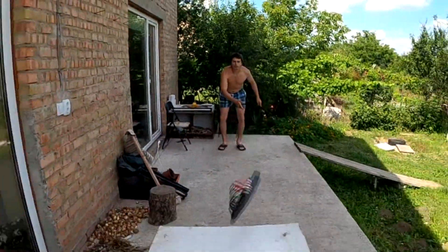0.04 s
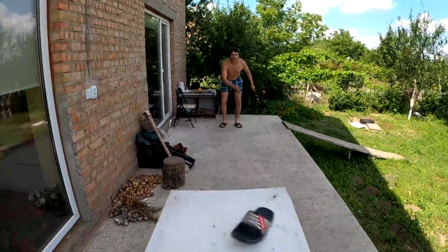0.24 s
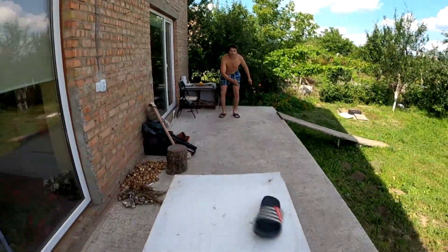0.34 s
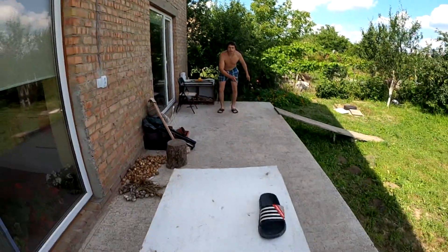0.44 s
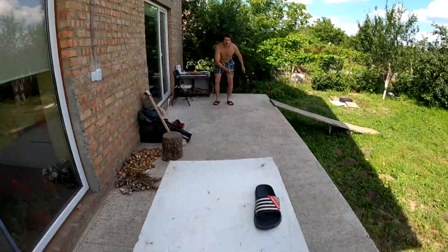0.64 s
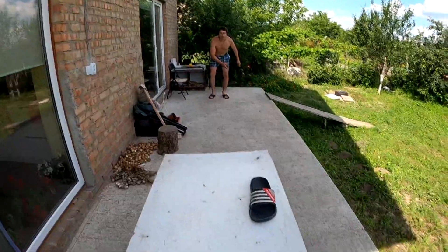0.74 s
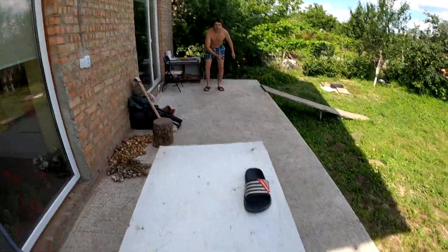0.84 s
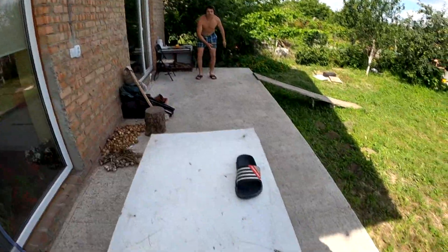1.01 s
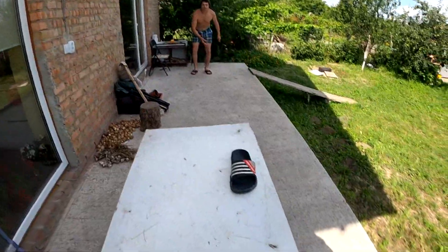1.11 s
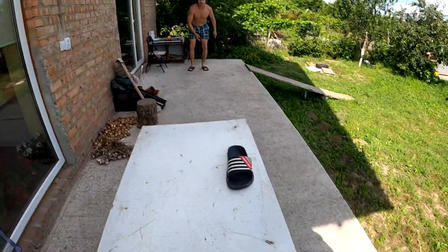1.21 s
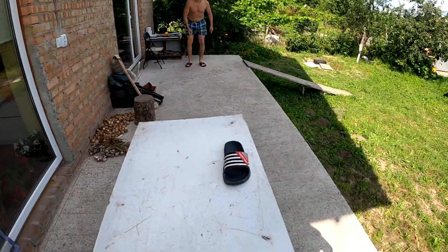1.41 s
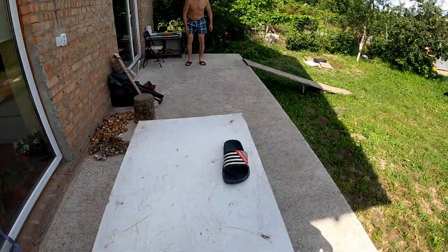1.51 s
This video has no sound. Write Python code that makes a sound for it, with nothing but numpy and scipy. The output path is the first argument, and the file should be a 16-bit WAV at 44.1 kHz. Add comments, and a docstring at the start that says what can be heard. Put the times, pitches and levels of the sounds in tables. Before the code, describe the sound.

A rubber sandal lands on a wooden board with a sharp, loud slap at about 0.25 seconds, echoing briefly off a patio wall. It lands again more softly at 0.4 seconds, skids slightly and settles with light taps by 0.5. A soft bump comes near 0.8 seconds. Quiet garden air continues to about 1.5 seconds, with barely audible insect ticks, a distant tone and one far bird chirp.

```python
"""Over quiet garden air and a light breeze on the microphone, a thrown rubber sandal lands on a wooden
board on a patio. Its edge knocks twice, exciting the board's modes, then the sole slaps flat and expels
air. It hops, lands again, skids and settles; a brick wall and the yard reflect each blow.
Then a faint distant tone sets in, a soft bump sounds close by, an insect ticks and a far bird chirps."""
import sys
import numpy as np
from scipy import signal
from scipy.fft import rfft, irfft
from scipy.io import wavfile

SR = 44100
rng = np.random.default_rng(int(sys.argv[2]) if len(sys.argv) > 2 else 0)


def digitize_waveform(pressure):
    """Quantize a signal to 16-bit integers and store it at the path in sys.argv[1].

    Rows of a 2-D input are taken as channels; values are limited to [-1, 1].
    """
    field = np.atleast_2d(pressure).T
    bounded = np.clip(field, -1, 1)
    quanta = np.round(bounded * 32767).astype(np.int16)
    wavfile.write(sys.argv[1], SR, quanta)


N = 68355
T = np.arange(N) / SR
BAND_EDGES_HZ = 45 * 2 ** np.arange(0, 8.6, .5)  # half-octaves


def from_db(db):
    """Amplitude ratio of a level in decibels."""
    return 10 ** (np.asarray(db) / 20)

def rms_one(x):
    """Normalisation to unit rms."""
    return x / np.sqrt(np.mean(x ** 2) + 1e-20)

def at_hz(points, hz):
    """Interpolation of a table's columns over log frequency."""
    knots, *columns = np.transpose(points)
    return [np.interp(np.log(hz + 1e-3), np.log(knots), column) for column in columns]

def convolve(x, response):
    """Convolution with an impulse response."""
    return signal.fftconvolve(x, response)[:N]

def butterworth(x, hz, kind, order=2):
    """Butterworth filtering: a maximally flat passband."""
    return signal.sosfilt(signal.butter(order, hz, kind, fs=SR, output="sos"), x + 1e-18)

def coloured(x, spectrum):
    """Minimum-phase filtering: folding the cepstrum makes the response causal."""
    size = 8192
    gain = from_db(at_hz(spectrum, np.arange(size // 2 + 1) * SR / size)[0])
    cepstrum = irfft(np.log(gain))
    cepstrum[1:size // 2] *= 2
    cepstrum[size // 2 + 1:] = 0
    return convolve(x, irfft(np.exp(rfft(cepstrum))))

def noise(spectrum):
    """Stationary filtered noise of unit rms."""
    return rms_one(coloured(rng.standard_normal(N), spectrum))

def swells(rows):
    """Superposed envelopes: square-root rise, then exponential decay with time constant `fall`."""
    envelope = 0
    for start, rise, fall, db in rows:
        attack = np.sqrt(np.clip((T - start) / rise, 0, 1))
        envelope += from_db(db) * attack * np.exp(-np.maximum(T - start - rise, 0) / fall)
    return envelope

def contact_force(start, rise_ms):
    """Force pulse of a compliant contact: a quick rise to 1 and a slower fall."""
    age = np.maximum(T - start, 0) * 1000 / rise_ms
    return age * np.exp(1 - age)


# Spectrum of the garden air. Each row: frequency in Hz, relative density in dB.
AIR_SPECTRUM = [(60, -8.5), (110, -4.5), (230, -9.5), (550, -15), (1100, -17), (1400, -20), (1660, -20),
                (2000, -22.5), (2500, -26.5), (3500, -28.5), (4600, -32), (6400, -32.5), (8500, -25),
                (9600, -37), (11500, -45.5), (13500, -54.5)]

def garden_air(level_db=-64.5, early_db=-3.5, rise_s=.4):
    """Ambient noise: a broadband floor that rises slightly, then holds."""
    return noise(AIR_SPECTRUM) * from_db(level_db + early_db * np.clip(1 - T / rise_s, 0, 1))

# Course of a distant tone. Each row: time in seconds, frequency in Hz, rms level in dB.
TONE_GLIDE = [(.7, 1660, -82.5), (.87, 1690, -76.5), (0.999, 1652, -89), (1.18, 1625, -78),
              (1.301, 1596, -75.5), (1.42, 1549, -85.5)]

def far_tone():
    """A faint gliding sinusoid, whose phase is the integral of its frequency."""
    times, hz, db = np.transpose(TONE_GLIDE)
    phase = 2 * np.pi * np.cumsum(np.interp(T, times, hz)) / SR
    return np.sqrt(2) * np.sin(phase) * np.interp(T, times, from_db(db), left=0, right=0)

def far_bird(hz=2920, start_s=.962, rise_s=.018, fall_s=.008, level_db=-72.5):
    """Amplitude modulation: one brief swell of a pure tone makes a chirp."""
    return np.sin(2 * np.pi * hz * T) * swells([(start_s, rise_s, fall_s, level_db)])

# Insect ticks. Each row: start, rise and fall in seconds, level in dB.
TICKS = [(.908, .005, 0.00505, -71), (1.124, 0.00503, 0.00518, -75.5), (1.331, .005, .006, -71.5)]
# Their spectrum. Each row: frequency in Hz, relative level in dB.
TICK_SPECTRUM = [(1000, -34), (4500, -12), (6200, 3), (8500, 0), (12000, -21)]

def insect():
    """Transients: short bursts of high-frequency noise are heard as ticks."""
    return noise(TICK_SPECTRUM) * swells(TICKS)

# Puffs on the microphone. Each row: start, rise and fall in seconds, level in dB.
PUFFS = [(.05, .04, 0.018, -59), (.62, 0.018, .012, -56)]
# Spectra of the steady breeze and the puffs. Each row: frequency in Hz, relative level in dB.
BREEZE_SPECTRUM = [(8, 0.5), (20, -9.5), (40, -12.5), (80, -19), (160, -42.5), (600, -74)]
PUFF_SPECTRUM = [(25, -13.5), (58, -1.5), (110, -11), (300, -41.5), (2000, -75.5)]

def breeze(steady_db=-55):
    """Turbulence: pressure fluctuations at the microphone make a low rumble with two puffs."""
    return from_db(steady_db) * noise(BREEZE_SPECTRUM) + noise(PUFF_SPECTRUM) * swells(PUFFS)

# Filter of the bump's tick. Each row: frequency in Hz, gain in dB.
BUMP_RESPONSE = [(60, -12), (300, -3), (550, -6), (1000, -12), (1550, 5), (1850, -3), (2250, 5.5),
                 (3000, -11), (6000, -23)]

def bump(start_s=.8105):
    """Pulse length sets bandwidth: a long pulse gives a soft, close bump, a short one its dull tick."""
    thump = from_db(-37) * contact_force(start_s, rise_ms=2)
    tick = from_db(-37.5) * coloured(contact_force(start_s, rise_ms=.095), BUMP_RESPONSE)
    return tick - thump

# Diffuse field of the yard. Each row: frequency in Hz, relative level in dB, 60 dB decay time in seconds.
YARD_DECAY = [(70, -16, .3), (156, -3.5, 0.36), (350, -2, .42), (700, -8.5, .35), (1500, 1, 0.27),
              (3000, -6, 0.52), (5000, -4.5, 0.3), (8500, -5.5, 0.37), (12063, -5, 0.24)]
# Treble shaping of that field. Each row: frequency in Hz, gain in dB.
YARD_RESPONSE = [(7000, 2.5), (8600, 6), (9800, -5.5), (12500, -9.5)]

def yard_reverberation(x, gain_db=-18.5, build_s=.004):
    """Reverberation: in each band the blows' energy builds up and decays. Returns middle and side."""
    white, wash = rng.standard_normal((2, 2, N)), 0
    for k, band in enumerate(zip(BAND_EDGES_HZ, BAND_EDGES_HZ[1:])):
        db, t60 = at_hz(YARD_DECAY, np.sqrt(np.prod(band)))
        decay = (from_db(-60 * T / t60) * (1 - np.exp(-T / build_s))) ** 2
        energy = np.maximum(convolve(butterworth(x, band, "band") ** 2, decay / decay.sum()), 0)
        carrier = rms_one(butterworth(white[k % 2], band, "band"))
        wash += from_db(gain_db + db) * np.sqrt(energy) * carrier
    return [coloured(channel, YARD_RESPONSE) for channel in wash]

# Reflections from the walls. Each row: delay in seconds, gain in dB.
REFLECTIONS = [(.0065, -19.5), (.015, -25.5), (.029, -28.5), (.0475, -22), (.053, -28), (0.081, -35.5),
               (.137, -37.5)]
# Filtering by the brickwork. Each row: frequency in Hz, gain in dB.
BRICK_RESPONSE = [(100, -7.5), (600, -5), (1500, 1), (3200, 0), (5000, -1.5), (10000, -4.5)]

def wall_echoes(x):
    """Early reflections: the brickwork returns delayed, weaker, slightly dull copies."""
    copies = sum(from_db(db) * np.interp(T - delay, T, x, left=0) for delay, db in REFLECTIONS)
    return coloured(copies, BRICK_RESPONSE)

# Skids on the board. Each row: start, rise and fall in seconds, level in dB.
SOLE_SKIDS = [(0.419, 0.012, 0.018, -43), (0.4475, 0.0029, 0.0036, -33)]
# Their spectrum. Each row: frequency in Hz, relative level in dB.
SKID_SPECTRUM = [(150, 16), (290, 12), (390, -10), (540, 6), (750, 2.5), (1200, -1), (2000, 2.5), (3200, 6),
                 (4400, -8.5), (6000, 0), (6900, -7), (8300, 7), (9600, -8), (12500, -22.5)]

def skids():
    """Sliding friction: rubber hisses as it slips over the wood."""
    return noise(SKID_SPECTRUM) * swells(SOLE_SKIDS)

# Claps of the flat sole. Each row: start, rise and fall in seconds, level in dB.
SOLE_SLAPS = [(0.2392, .0005, 0.0027, -24), (0.2484, .002, 0.003, -10.5), (0.2522, .0004, .0012, -14),
              (0.4176, 0.00081, 0.00614, -45.5)]
# Their spectrum. Each row: frequency in Hz, relative level in dB.
SLAP_SPECTRUM = [(100, -20), (450, -5.5), (750, -5.5), (1020, 6), (1230, -13.5), (1500, 5), (1800, 0.5),
                 (2000, 0.5), (2650, 3.5), (3600, -1.5), (4100, -8), (6000, -6), (7600, -10), (8400, -2.5),
                 (9400, -16.5), (12500, -32)]

def slaps():
    """Air displacement: a burst of noise escapes from under the tread as it claps down."""
    envelope = swells(SOLE_SLAPS)
    bursts = coloured(rng.standard_normal(N) * envelope, SLAP_SPECTRUM)
    return rms_one(bursts) * np.sqrt(np.mean(envelope ** 2))

# The board's short modes. Each row: frequency in Hz, relative density in dB, 60 dB decay time in seconds.
DENSE_MODES = [(150, -19.5, 0.02), (398.9, -8.5, 0.0601), (900, -5, 0.017), (1480, -2, 0.0223),
               (3220, 1.5, 0.013), (4621, -7, 0.041), (8420, -1, .016), (12140, -16.5, 0.017)]

def dense_modes(force, gain_db=-4.5):
    """Modal overlap: the board's many short modes respond like bands of decaying noise."""
    white, response = rng.standard_normal((2, N)), 0
    for k, (low, high) in enumerate(zip(BAND_EDGES_HZ, BAND_EDGES_HZ[1:])):
        db, t60 = at_hz(DENSE_MODES, np.sqrt(low * high))
        decay = from_db(-60 * T / t60) + 1e-12
        band = butterworth(white[k % 2] * decay, [low, high], "band")
        response += rms_one(band) * from_db(db) * np.sqrt(high - low)
    return from_db(gain_db) * convolve(force, response / np.linalg.norm(response))

# The board's strongest modes. Each row: frequency in Hz, gain in dB, 60 dB decay time in seconds.
STRONG_MODES = [(102, -57, 0.13), (164, -56.5, .2), (197, -48, 0.051), (289.39, -56.5, 0.35),
                (340.7, -59, 0.18), (407.9, -57.5, 0.15), (537.5, -51, 0.15), (717, -58, 0.019),
                (690, -52.5, .06), (832, -53.5, 0.034), (980, -51.5, 0.061), (950, -47, 0.15),
                (1435, -54.5, 0.35), (2570, -54, 0.063)]

def strong_modes(force):
    """Resonance: each mode of the board is a damped oscillator driven by the force."""
    ringing = 0
    for hz, db, t60 in STRONG_MODES:
        radius, angle = from_db(-60 / (t60 * SR)), 2 * np.pi * hz / SR
        feedback = [1, -2 * radius * np.cos(angle), radius ** 2]
        ringing += from_db(db) * signal.lfilter([0, np.sin(angle)], feedback, force + 1e-18)
    return ringing

# Contacts of sandal and board. Each row: start in seconds, force level in dB, rise time in milliseconds,
# coupling to the modes in dB, treble cutoff in Hz.
CONTACTS = [(0.2102, -38.5, 0.029, -24, 5000), (0.2173, -30, 0.057, -9, 6040),
            (0.2252, -28, 0.04, -7.5, 6040), (0.2338, -6.5, .07, -13.5, 7000),
            (0.2367, -8.5, 0.02, -4.5, 9000), (0.2392, -4.5, 0.21, -1.5, 10000),
            (0.2479, -15.5, 0.6, 4.5, 9000), (0.2526, -15.5, .06, -15, 9000),
            (0.4172, -23.5, 0.069, 7.5, 4500), (0.4207, -26.5, 0.072, -10, 4500),
            (0.4242, -38, 0.87, 14, 2000), (0.4761, -30, 0.029, 1, 4007), (0.4809, -42, 0.61, 4, 3005),
            (0.5028, -31.5, 0.027, 7, 3700), (0.5063, -38, 0.017, -6, 3695), (0.5118, -48.5, 1, 12, 2000)]
# Radiation of the thud. Each row: frequency in Hz, gain in dB.
THUD_RESPONSE = [(30, -22), (65, -14), (100, -3), (200, 3.5), (450, -1.5), (950, 10.5), (1250, -9.5),
                 (1600, 2.5), (2000, -2), (3300, 4.5), (4600, -3.5), (7000, -3), (8400, 5), (10000, -7.5),
                 (13000, -19.5)]

def knocks():
    """Impact excitation: each contact, rounded off by soft rubber, radiates a thud and rings the board."""
    total_force, drive = 0, 0
    for start, db, rise_ms, coupling_db, cutoff_hz in CONTACTS:
        force = from_db(db) * butterworth(contact_force(start, rise_ms), cutoff_hz, "low")
        total_force += force
        drive += from_db(coupling_db) * force
    return strong_modes(drive) + dense_modes(drive) - coloured(total_force, THUD_RESPONSE)


def scene(bass_cut_hz=110, width_db=-33.5):
    """Superposition: all sources lie straight ahead; only the reflections have a trace of width."""
    # Acoustic short circuit: at low frequencies air slips round the board and little is radiated.
    sandal = butterworth(knocks() + slaps() + skids(), bass_cut_hz, "high", order=4)
    echoes = wall_echoes(sandal)
    wash, wash_side = yard_reverberation(sandal)
    garden = garden_air() + far_tone() + far_bird() + breeze() + insect()
    middle = garden + bump() + wash + echoes + sandal
    side = from_db(width_db) * (wash_side + echoes)
    return np.array([middle + side, middle - side])

def record(dry, cutoff_hz=13200):
    """Band limiting: a steep elliptic low-pass removes the highest treble."""
    return signal.sosfilt(signal.ellip(10, .1, 70, cutoff_hz, fs=SR, output="sos"), dry)


dry = scene()
out = record(dry)
digitize_waveform(out)
```